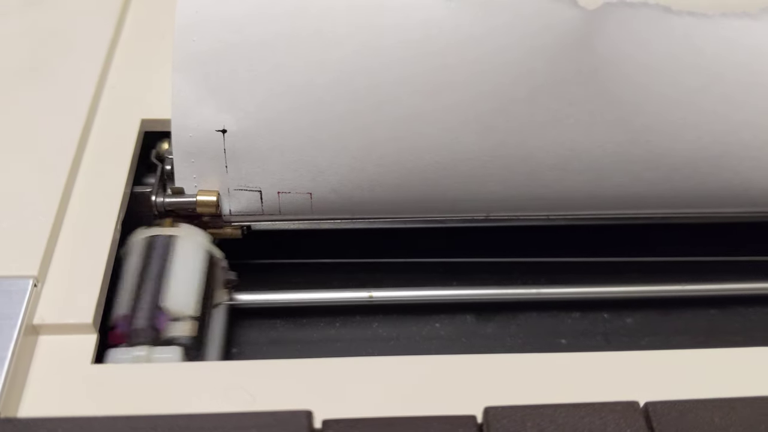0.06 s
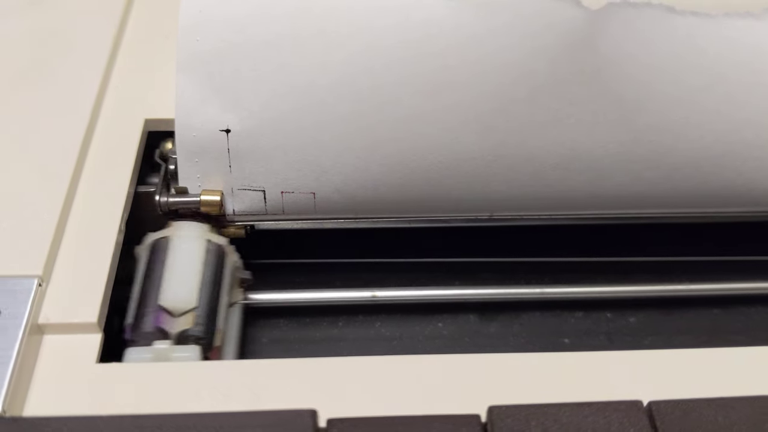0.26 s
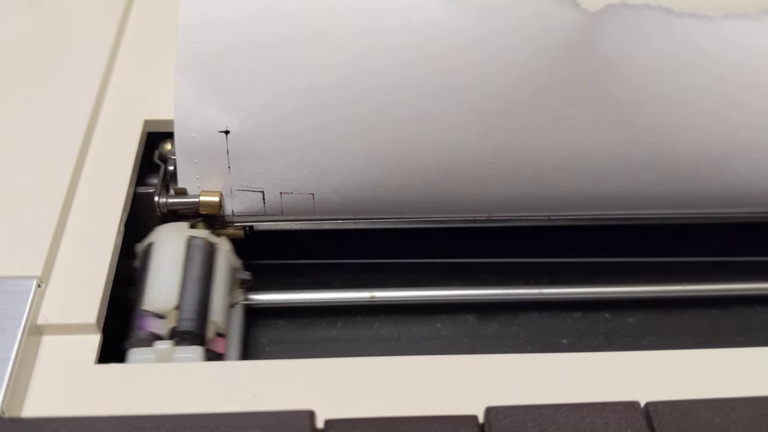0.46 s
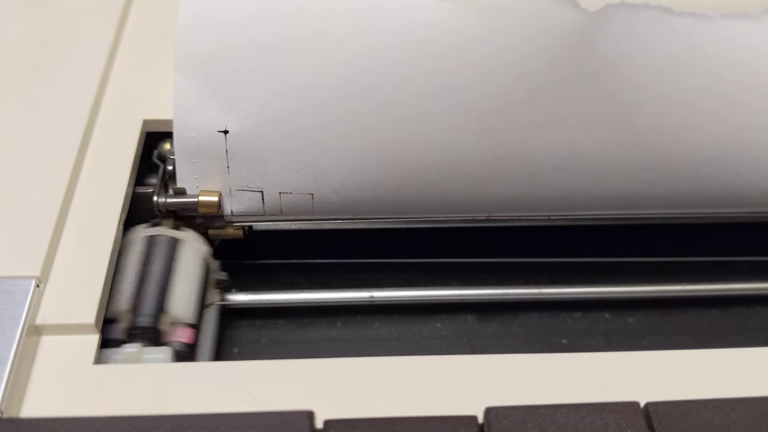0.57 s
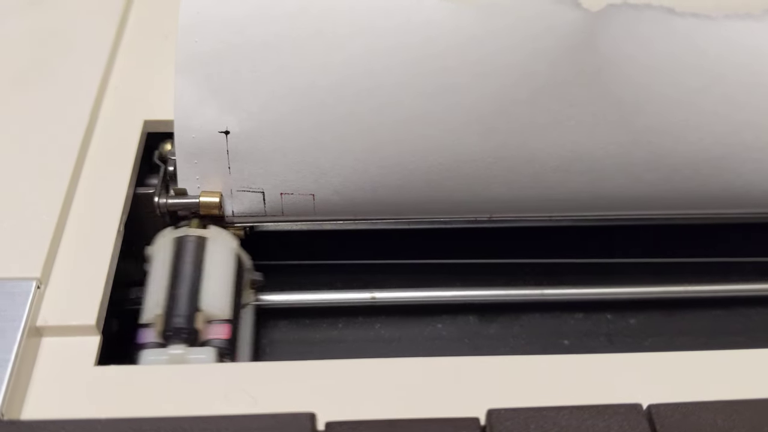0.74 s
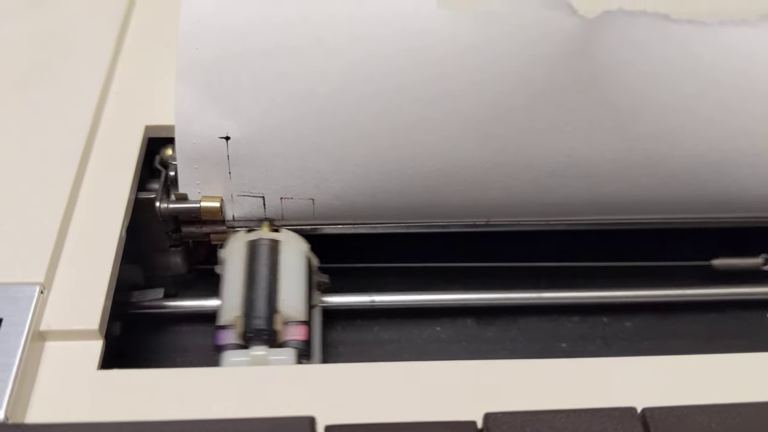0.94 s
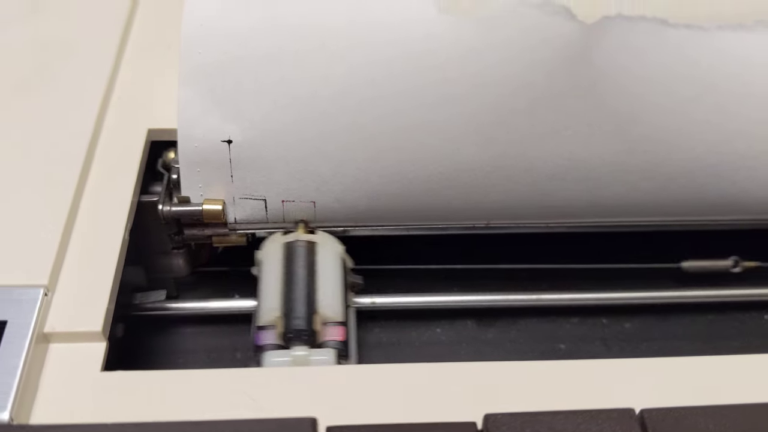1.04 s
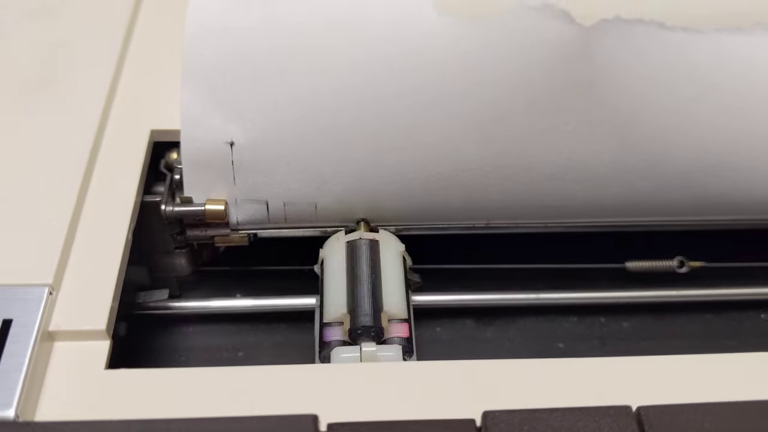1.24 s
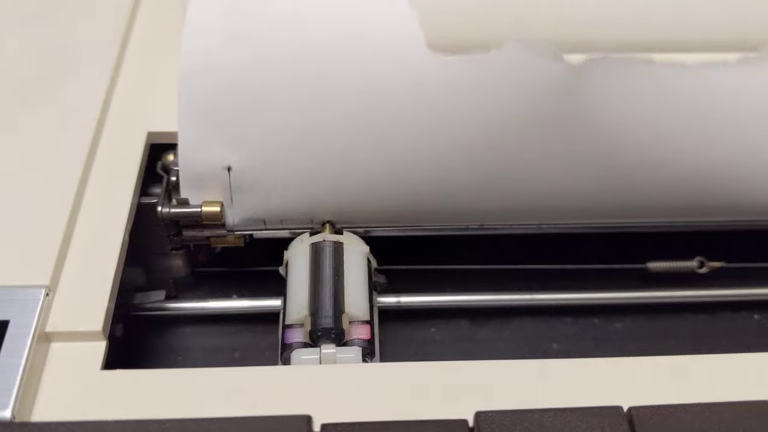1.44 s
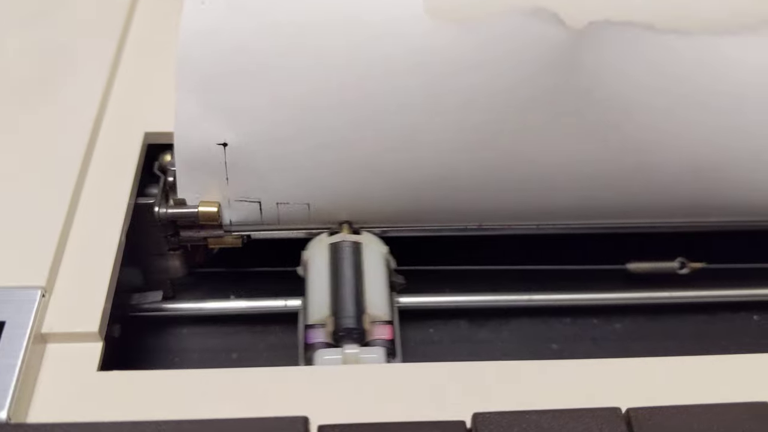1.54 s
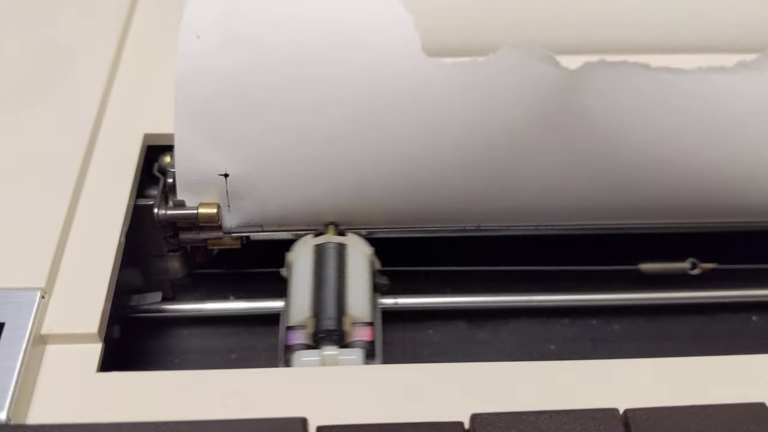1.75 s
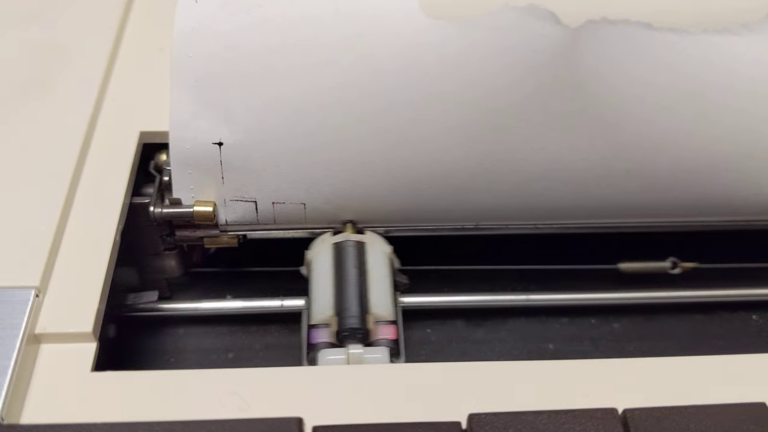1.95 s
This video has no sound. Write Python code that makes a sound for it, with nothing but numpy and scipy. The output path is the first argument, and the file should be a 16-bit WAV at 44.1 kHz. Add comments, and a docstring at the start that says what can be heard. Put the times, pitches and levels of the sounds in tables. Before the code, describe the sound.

A small pen plotter works close by in a quiet room. It snaps sharply at about 0.2, 0.45 and 0.7 seconds, with thin ticks and dull clacks after each; the second snap carries a low microphone thump. From 0.9 to 1.25 seconds the carriage slides, squeaking faintly. From 1.3 to 2 seconds come four short strokes: soft pen taps and faint scratching on paper, with clacks between them.

```python
"""A small pen plotter works close by in a quiet room. First its carriage (the sliding pen holder) nudges
the end stop three times to turn the pen barrel: the pawl (a springy catch) snaps and ticks back, and the
carriage clacks. The second snap comes with a low thump on the microphone. Next the carriage slides along
its rail, squeaking faintly. Last come four short strokes: the pen drops and scratches over the paper,
and the carriage stops with a clack between strokes."""
import sys
import numpy as np
from scipy import signal
from scipy.fft import rfft, irfft, next_fast_len
from scipy.io import wavfile
from scipy.ndimage import uniform_filter1d, map_coordinates

SR = 44100
rng = np.random.default_rng(int(sys.argv[2]) if len(sys.argv) > 2 else 0)


def wav_record(signal):
    """Record a signal, one row per channel, as 16-bit PCM in the file named by sys.argv[1]."""
    frames = np.transpose(np.atleast_2d(signal))
    bounded = np.clip(frames, -1, 1)
    # unit amplitude maps onto the largest positive 16-bit level
    quanta = np.round(bounded * 32767).astype(np.int16)
    wavfile.write(sys.argv[1], SR, quanta)


N = 88200  # 2 seconds


def pawl():
    """The catch snaps brightly as the barrel turns, and ticks more thinly as it springs back."""
    # One hit a row: start_s, level_db, tilt_db_per_octave, ring1_hz, boost1_db, ring2_hz, boost2_db
    snap_hits = [(.2132, -20.5, -0.5, 14500, 10, 3730, 3.5), (.4476, -22, 2, 14600, 0.5, 13800, -0.5),
                 (.6846, -17.5, 1.5, 13500, 6.5, 6050, 4)]
    tick_hits = [(.3343, -35, 0.5, 8200, 8, 10500, 2), (.5843, -31.5, 0, 9800, 14, 11700, 10),
                 (.8079, -34, 0, 3970, 6.5, 5000, 7.5)]
    # Tone colour (how strong each pitch is) of a snap and of a tick: pitch_hz, gain_db
    snap_colour = [(300, -38), (1000, -26), (2400, -26.5), (3900, -27.5), (4700, -30.5), (6000, -22),
                   (6800, -29.5), (8200, -18), (8900, -31), (9600, -15.5), (10900, -20.5), (12000, -10.5),
                   (12600, -24), (13500, -4), (14700, -1.5), (15500, -14), (16200, -26)]
    tick_colour = [(300, -21), (1500, -21), (3900, -11), (4500, -20), (5600, -2.5), (6600, -18),
                   (7800, -1.5), (8400, -7.5), (8900, -7), (9500, 0), (10000, -7), (10600, -4),
                   (12000, -5.5), (12700, -5), (14600, 3.5), (15500, -7), (16200, -11)]
    snaps = hits(snap_hits, snap_colour, ring_width_hz=560, room_db=-5,
                 chatter_db=1, chatter_s=0.0092, bounce_s=0.0007, bounce_db=-2)
    ticks = hits(tick_hits, tick_colour, ring_width_hz=500, room_db=-6.5,
                 chatter_db=8, chatter_s=0.0098, bounce_s=0.0007, bounce_db=4.5)
    return snaps + ticks


def thump(start_s=0.4476, swing_db=-22.5, spike_db=-20.5):
    """A pressure spike overloads the microphone, which swings back slowly."""
    edge_s, swell_s, rebound_s, settle_s, spike_width_s = 0.00021, 0.0051, 0.049, 0.027, 0.00017
    t = np.arange(N) / SR - start_s
    age = np.maximum(t, 0)
    onset = 1 - np.exp(-(age / edge_s) ** 2)
    swing = onset * (1 + age / swell_s) * (age / rebound_s - 1) * np.exp(-age / settle_s)
    spike = np.exp(-((t + edge_s) / spike_width_s) ** 2)
    return amp(swing_db) * swing + amp(spike_db) * spike


def pen():
    """The pen drops with a rattle, then its tip scratches over the paper."""
    # Pen meets paper: start_s, level_db, tilt_db_per_octave, ring1_hz, boost1_db, ring2_hz, boost2_db
    drops = [(1.345, -34, 1.5, 3330, 7.5, 357, 11), (1.3985, -43.5, 1.5, 14800, 13, 1400, -3),
             (1.533, -35.5, 0, 2320, 2.5, 950, 2), (1.7215, -34, 1, 7670, 7, 356, 9.5),
             (1.7725, -45, 2, 14800, 10, 2900, 13), (1.9095, -34.5, -.5, 2880, 13, 1480, 15)]
    # Pen draws: start_s, length_s, level_db, tilt_db_per_octave
    strokes = [(1.341, 0.082, -55, 0), (1.533, 0.09, -56, -1), (1.731, 0.074, -56, 0), (1.921, .1, -56, 0)]
    # Tone colour of a drop and of a scratch: pitch_hz, gain_db
    drop_colour = [(120, -7.5), (350, -2.5), (600, -8), (850, 3.5), (1150, -14), (1450, -4.5), (1900, -4),
                   (2300, 0.5), (4000, -2), (5000, -7), (7700, -6.5), (11000, -14.5), (15000, -13),
                   (16200, -29)]
    scratch_colour = [(180, -29), (300, -0.5), (519, -3), (701, -13), (870, -10), (1150, -7), (1410, -1.5),
                      (2070, -14), (2980, -3), (3890, -6), (4830, -17), (6000, -6.5), (6620, -29),
                      (7320, -13), (8500, -20), (9710, -11.5), (10700, -18.5), (14700, -10), (16000, -23)]
    t = np.arange(N) / SR
    track = hits(drops, drop_colour, ring_width_hz=280, room_db=-2.5,
                 chatter_db=4.5, chatter_s=0.023, bounce_s=0.000955, bounce_db=-1)
    for start_s, length_s, level_db, tilt_db in strokes:
        fade_in = np.clip((t - start_s) / 0.012, 0, 1)
        fade_out = amp(-60 * np.maximum(t - start_s - length_s, 0) / 0.13)
        track += fade_in * fade_out * noise(scratch_colour, tilt_db) * amp(level_db + 0.65 * wobble(300))
    return track


def carriage():
    """The carriage rubs softly on its rail and gives a dull clack at each stop."""
    # Stops: start_s, level_db, tilt_db_per_octave, ring1_hz, boost1_db, ring2_hz, boost2_db
    stops = [(.2572, -42.5, -1.5, 1640, 6.5, 5660, 12), (.375, -38, -1, 3150, 12, 2350, 2.5),
             (.4935, -44.5, -1, 2330, -8, 1500, -1), (.6105, -38, -1, 2380, 7, 3070, 10.5),
             (.728, -43.5, -1, 2270, -2, 1490, 2), (1.2485, -50, 0.5, 5860, 24, 3600, 10),
             (1.439, -40.5, -1, 1390, 11, 2760, 5), (1.443, -40.5, 0, 3030, 18.5, 7440, 9),
             (1.6255, -43.5, -2.5, 1410, 5, 3740, 11), (1.814, -42.5, 2, 1430, 15.5, 2300, 6),
             (1.819, -40.5, -1, 2950, 14, 1650, 9)]
    # How loud the rubbing is: time_s, level_db
    rub_levels = [(0, -68.5), (.13, -64), (.2, -64), (.42, -67.5), (.55, -73), (0.849, -73), (1.05, -68.5),
                  (1.12, -63), (1.18, -66), (1.3, -65), (1.36, -70)]
    # Tone colour of a clack and of the rubbing: pitch_hz, gain_db
    clack_colour = [(150, -20), (350, -13.5), (600, -15.5), (870, 5.5), (1100, -8), (1450, -1),
                    (1900, -4.5), (2400, 1.5), (3100, -4), (4600, -6), (6000, -7), (8000, -7.5),
                    (11000, -16), (16000, -30)]
    rub_colour = [(300, -11), (1500, -2.5), (2500, -3), (3300, -1), (4000, 3), (4800, -7), (5800, -9),
                  (7000, -3.5), (9500, -4), (11000, -29), (16000, 0)]
    level_db = np.interp(np.arange(N) / SR, *np.transpose(rub_levels))
    rubbing = noise(rub_colour) * amp(level_db + 2.4 * wobble(40.58))
    clacks = hits(stops, clack_colour, ring_width_hz=220, room_db=-4.5,
                  chatter_db=0.5, chatter_s=0.058, bounce_s=0.0017, bounce_db=0)
    return rubbing + clacks


def squeaks(width_hz=550):
    """Rubbing on the rail makes narrow bands of noise that swell and fade."""
    # Faint squeaks: peak_s, length_s, pitch_hz, level_db
    rail_squeaks = [(0.93, 0.024, 7200, -71), (0.998, 0.024, 9760, -69.5), (1.116, 0.024, 3400, -63.5),
                    (1.172, 0.029, 4030, -61), (1.509, 0.017, 2390, -59.5)]
    t, track = np.arange(N) / SR, np.zeros(N)
    for peak_s, length_s, pitch_hz, level_db in rail_squeaks:
        band = unit(filtered(rng.standard_normal(N), lambda hz: peak(hz, pitch_hz, width_hz)))
        track += amp(level_db) * band * np.exp(-2 * ((t - peak_s) / length_s) ** 2)
    return track


def hits(rows, body, ring_width_hz, room_db, **touch):
    """Each hit makes a part ring; nearby walls and the room answer."""
    # Echoes from nearby surfaces: delay_s, gain_db
    echoes = [(.0071, -12), (.0094, -19.5), (0.0235, -25)]
    # Tone colour the room adds: pitch_hz, gain_db
    room_colour = [(500, 2.5), (2500, 2.5), (7000, 0), (12000, -1), (14400, -3.5), (15500, 8)]
    room_ring_share = 0.77  # a hit's two ringing pitches stand out less in the room
    track = np.zeros(N)
    for start_s, level_db, tilt_db, ring1_hz, boost1_db, ring2_hz, boost2_db in rows:
        def colour(hz, share=1):
            ring1 = boost1_db * peak(hz, ring1_hz, ring_width_hz)
            ring2 = boost2_db * peak(hz, ring2_hz, ring_width_hz)
            return tilted(body, hz, tilt_db) + share * (ring1 + ring2)

        hit = signal.fftconvolve(contact(**touch), ringing(colour))
        strength = amp(level_db) * np.sqrt(SR / 1000)  # level as if all the energy fell within 1 ms
        for delay_s, gain_db in [(0, 0.022)] + echoes:  # the direct sound comes first
            add(track, start_s + delay_s, strength * amp(gain_db) * hit / np.linalg.norm(hit))
        room_ring = ringing(lambda hz: colour(hz, room_ring_share) + along(room_colour, hz))
        tail = signal.fftconvolve(room_ring / np.linalg.norm(room_ring), room_tail())
        add(track, start_s, strength * amp(room_db) * tail)
    return track


def contact(chatter_db, chatter_s, bounce_s, bounce_db, size=4096):
    """The push of one hit: a blow, a bounce, and chatter that fades by 60 dB in chatter_s."""
    t = np.arange(size) / SR
    chatter = rng.standard_normal(size) * amp(-60 * t / chatter_s)
    force = amp(chatter_db) * chatter / np.linalg.norm(chatter)
    force[0] += 1  # the blow
    force[round(bounce_s * SR)] += amp(bounce_db)
    # Even out lows and highs, so that the struck part sets the tone colour.
    power = np.abs(uniform_filter1d(np.abs(rfft(force)) ** 2, 24))
    return signal.fftconvolve(force, ringing(lambda hz: -10 * np.log10(power + 1e-9)))


def room_tail():
    """The room's many echoes blur into a short, fading noise."""
    # Time the room takes to fade by 60 dB: pitch_hz, fade_s
    fade_times = [(200, 0.32), (2500, 0.18), (8000, 0.24), (15000, 0.13)]
    hz, t, bands = signal.stft(rng.standard_normal(SR // 3), SR, nperseg=256)
    fade_in = 1 - np.exp(-t / 0.00075)
    fade_out = amp(-60 * t / along(fade_times, hz)[:, None])
    tail = signal.istft(bands * fade_out * fade_in, SR, nperseg=256)[1]
    return tail / np.linalg.norm(tail)


def background(noise_db=-60):
    """Quiet room noise with a faint, wavering hum."""
    # Tone colour of the room noise: pitch_hz, gain_db
    air_colour = [(15, -33), (30, -10), (50, -8), (70, -5.5), (100, -4), (150, 1.5), (250, 0), (310, -7.5),
                  (400, -12.5), (520, -14), (730, -14), (880, -8.5), (1050, -17.5), (1300, -21),
                  (1600, -17.5), (2000, -24.5), (2450, -11.5), (2750, -26), (3100, -14.5), (3900, -22),
                  (4900, -27.5), (5600, -15.5), (6600, -30), (8000, -26), (10000, -28.5), (12500, -26.5),
                  (14000, -27), (16000, -35)]
    # Tones in the hum: pitch_hz, level_db
    hum_tones = [(48.6, -73.5), (194, -76.5), (253, -74.5), (860, -81)]
    t = np.arange(N) / SR
    hum = sum(amp(db) * np.sqrt(2) * np.sin(2 * np.pi * hz * t + 0.5 * wobble(4.7))
              for hz, db in hum_tones)
    return amp(noise_db) * noise(air_colour) + hum


def amp(db):
    """Turn decibels into a multiplier."""
    return 10 ** (np.asarray(db) / 20)


def unit(x):
    """Scale x to an average power of 1."""
    return x / np.sqrt(np.mean(x ** 2) + 1e-20)


def peak(hz, centre_hz, width_hz):
    """A hump of height 1 around one pitch."""
    return 1 / (1 + (2 * (hz - centre_hz) / width_hz) ** 2)


def along(points, hz):
    """Read between (pitch_hz, value) points, with octaves evenly spaced."""
    pitches, values = np.transpose(points)
    return np.interp(np.log(hz + 1), np.log(pitches + 1), values)


def tilted(colour, hz, tilt_db):
    """A tone colour in dB, brighter by tilt_db each octave above 300 Hz."""
    return along(colour, hz) + tilt_db * np.log2(np.maximum(hz, 300) / 3000)


def filtered(x, gain_at):
    """Turn each pitch in x up or down by gain_at(hz)."""
    size = next_fast_len(N + SR // 2)
    return irfft(rfft(x, size) * gain_at(np.fft.rfftfreq(size, 1 / SR)), size)[:N]


def noise(colour, tilt_db=0):
    """Noise with the given tone colour and an average power of 1."""
    return unit(filtered(rng.standard_normal(N), lambda hz: amp(tilted(colour, hz, tilt_db))))


def wobble(rate):
    """A smooth curve through `rate` random points a second."""
    return map_coordinates(rng.standard_normal(int(N * rate / SR) + 4), [np.arange(N) * rate / SR])


def ringing(colour_db, size=4096):
    """How a part with this tone colour rings after one sharp tap."""
    log_gain = np.log(amp(colour_db(np.fft.rfftfreq(size, 1 / SR))) + 1e-6)
    folded = irfft(log_gain)
    # Fold the second half onto the first, so that nothing sounds before the tap.
    folded[1:size // 2] *= 2
    folded[size // 2 + 1:] = 0
    return irfft(np.exp(rfft(folded)))


def add(track, start_s, x):
    """Mix x into the track at start_s."""
    part = track[max(round(start_s * SR), 0):][:len(x)]
    part += x[:len(part)]


def scene():
    """The plotter and the room at one microphone."""
    return (pawl() + carriage() + squeaks() + pen() + thump() + background())[None]


def record(dry):
    """Cut away the very highest treble."""
    top_hz, slope_hz = 16100, 600
    return np.array([filtered(x, lambda hz: np.clip((top_hz - hz) / slope_hz + 0.5, 0, 1)) for x in dry])


dry = scene()
out = record(dry)
wav_record(out)
```